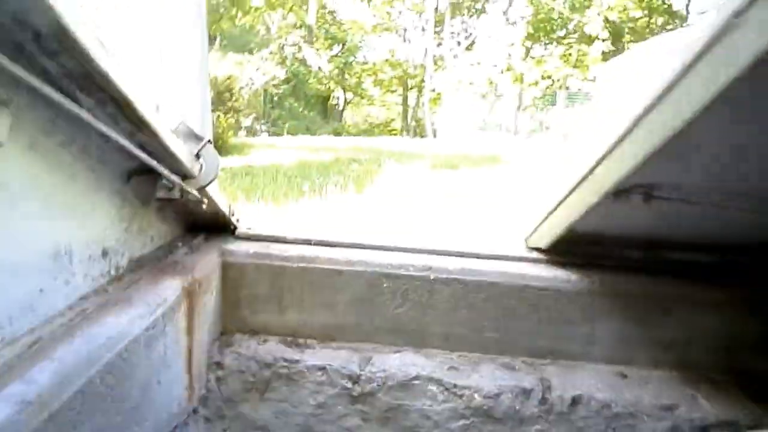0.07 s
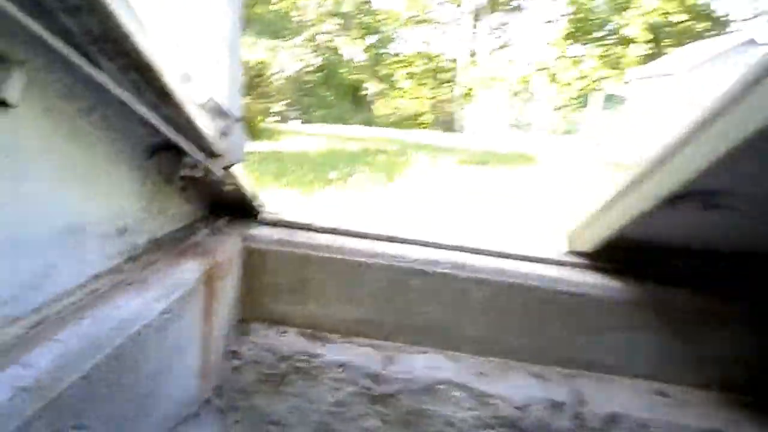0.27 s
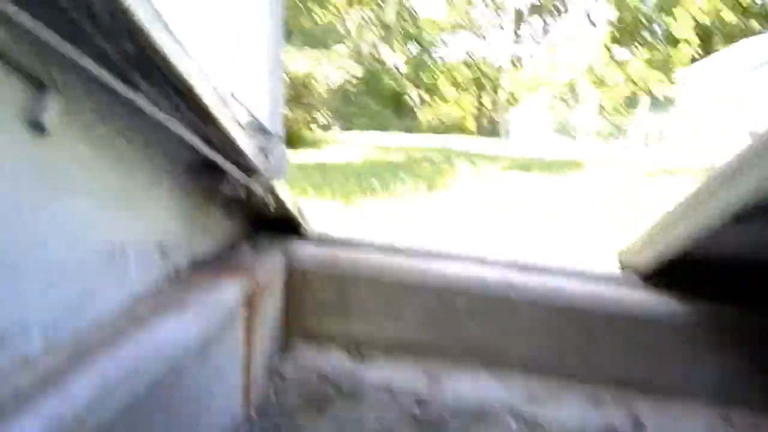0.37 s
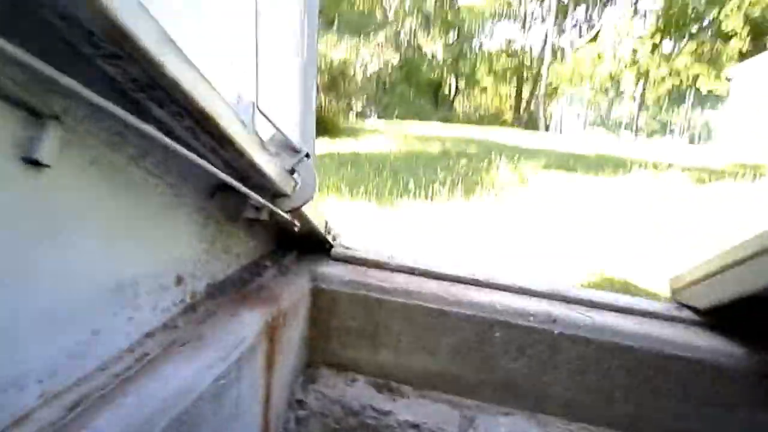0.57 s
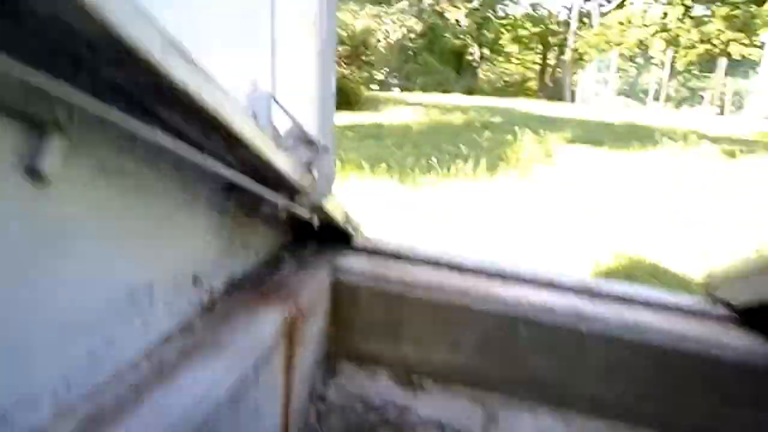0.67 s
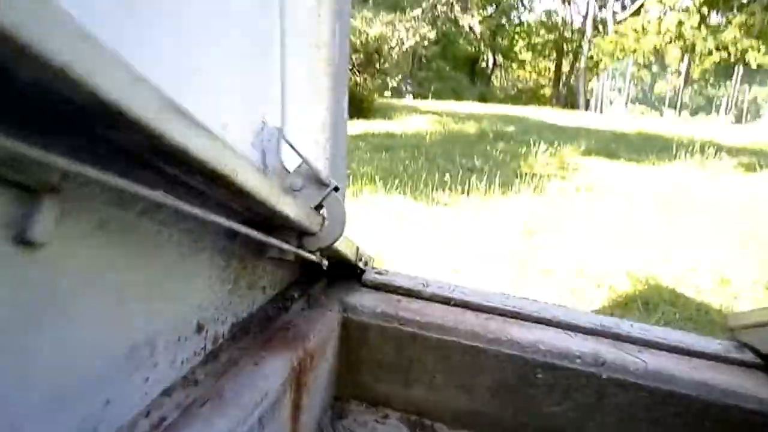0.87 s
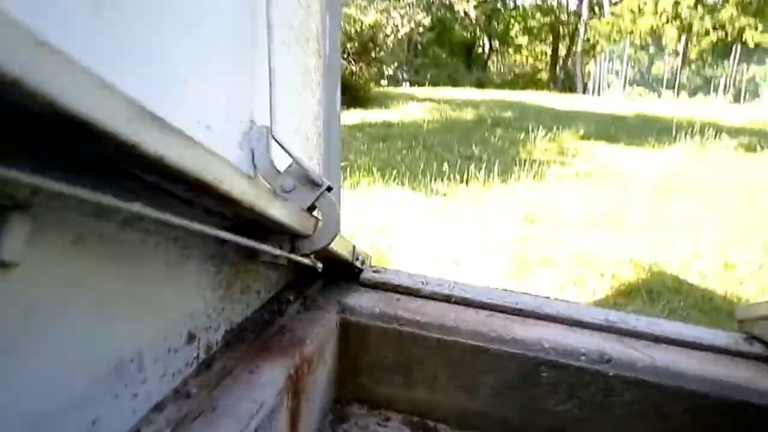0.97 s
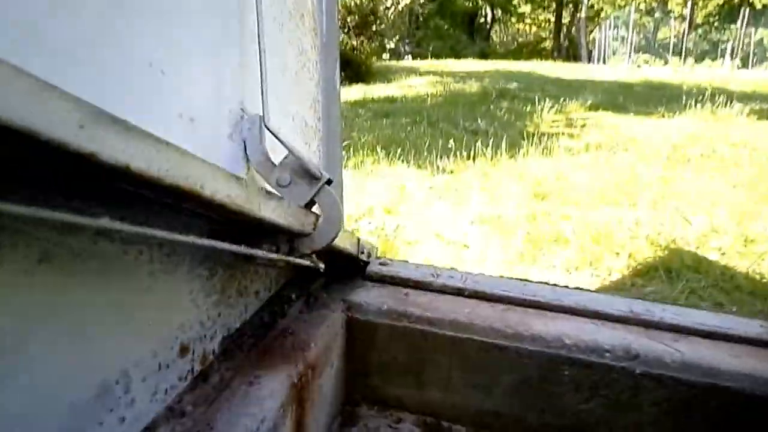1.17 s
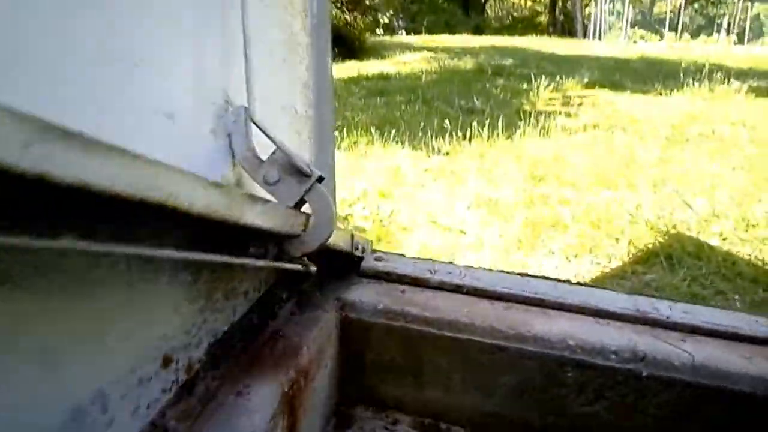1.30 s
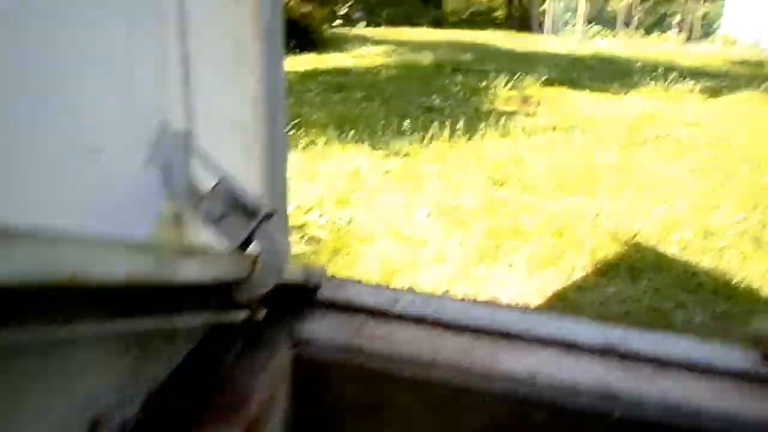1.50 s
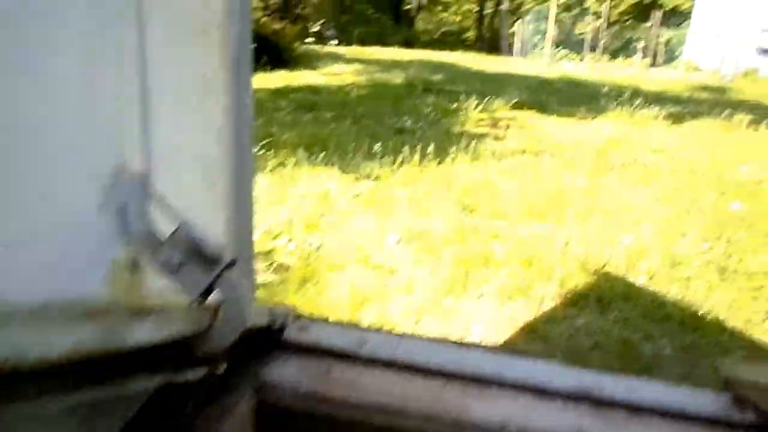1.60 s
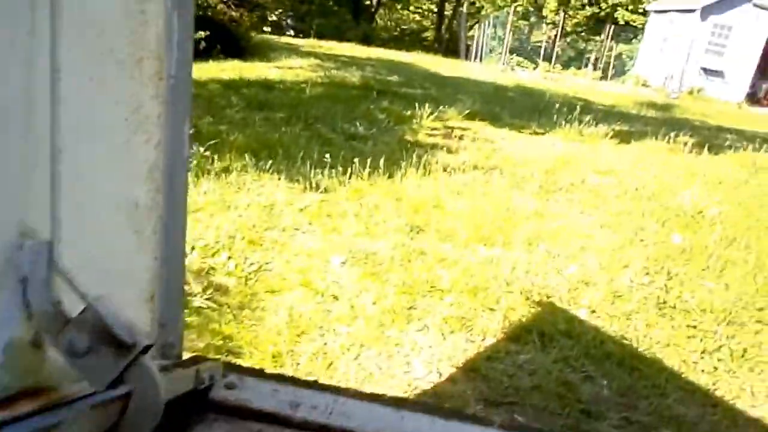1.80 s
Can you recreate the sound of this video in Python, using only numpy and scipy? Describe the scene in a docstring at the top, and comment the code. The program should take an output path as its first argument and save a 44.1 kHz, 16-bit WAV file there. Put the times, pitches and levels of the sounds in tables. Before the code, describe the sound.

A steel cellar hatch opens with a thin hinge squeal and a dull knock, then squawks at about 0.3 seconds. A whistling whine sinks into a groan near 0.8 seconds and rises again, with scraping and a short stairwell echo. At about 1.15 seconds the hatch bangs loudly, then rebounds and rattles until 1.6. A faint squeak follows near 1.8 seconds over a soft outdoor hush.

```python
"""A thin squeal comes from the dry hinges of a steel cellar hatch pushed open from below. Stick-slip
friction goes on to give a short squawk, a whistle, then a whine that sinks into a groan as the load
grows and rises as it eases. The leaf scrapes, bangs against its stop, rebounds and rattles, each
impact exciting its modes, and settles with a faint squeak. The stairwell echoes the hinges."""
import sys
import numpy as np
from scipy import signal
from scipy.fft import rfft, irfft, next_fast_len
from scipy.io import wavfile
from scipy.ndimage import uniform_filter1d, minimum_filter1d, map_coordinates

SR = 44100
rng = np.random.default_rng(int(sys.argv[2]) if len(sys.argv) > 2 else 0)


def wav_out(sig):
    """Save sig, one row per channel (or a flat mono array), as 16-bit PCM at SR to the path in sys.argv[1]."""
    wavfile.write(sys.argv[1], SR, np.round(np.clip(np.atleast_2d(sig).T, -1, 1) * 32767).astype(np.int16))


N = 81585
FLUTTER_HZ = 170  # rate of the fine pitch tremor of hinge and pin


def amp(db):
    """Amplitude ratio of a level in decibels."""
    return 10 ** (np.asarray(db) / 20)


def unit(x):
    """Normalisation to an rms of 1."""
    return x / np.sqrt(np.mean(x ** 2) + 1e-20)


def along(points, hz):
    """Interpolation of (Hz, value) points on a logarithmic frequency axis."""
    freqs, values = np.transpose(points)
    return np.interp(np.log(hz + 1), np.log(freqs + 1), values)


def curves(rows):
    """Linear interpolation in time: one value per sample for each column after the first."""
    times, *columns = np.transpose(rows)
    return [np.interp(np.arange(N) / SR, times, column) for column in columns]


def wobble(rate):
    """Smooth random modulation: a spline through `rate` random values a second."""
    return map_coordinates(rng.standard_normal(4096), [np.arange(N) * rate / SR], mode='wrap')


def filtered(x, response):
    """Linear filtering: the spectrum of x is multiplied by a frequency response."""
    size = 2 * next_fast_len(len(x))
    return irfft(rfft(x, size) * response(np.fft.rfftfreq(size, 1 / SR)), size)[:len(x)]


def coloured(x, tone):
    """Minimum-phase filtering: a causal response with the given (Hz, dB) shape."""
    def response(hz):
        cepstrum = irfft(np.log(amp(along(tone, hz))))
        cepstrum[1:len(cepstrum) // 2] *= 2
        cepstrum[len(cepstrum) // 2 + 1:] = 0
        return np.exp(rfft(cepstrum))
    return filtered(x, response)


def noise(tone):
    """Spectral shaping: Gaussian noise of rms 1 with the given (Hz, dB) shape."""
    return unit(filtered(rng.standard_normal(N), lambda hz: amp(along(tone, hz))))


def damped(x, t60):
    """Frequency-dependent damping over one second; T60 is the time taken to fall by 60 dB."""
    hz, t, spectra = signal.stft(x[:SR], SR, nperseg=256)
    decay = amp(-60 * t / along(t60, hz)[:, None])
    return signal.istft(spectra * decay, SR, nperseg=256)[1][:SR]


def ring(modes, scatter_db, detune_hz=3):
    """Free vibration: one second of damped modes, each randomly offset in level and frequency."""
    t = np.arange(SR) / SR
    return sum(amp(db + scatter_db * rng.normal() - 60 * t / t60)
               * np.sin(2 * np.pi * (hz + detune_hz * rng.normal()) * t) for hz, db, t60 in modes)


def stick_slip(phrase, tone):
    """Relaxation oscillation: one pulse per slip; roughness scatters timing and size and adds grit."""
    # Dry hiss of the slipping pin. Each row: frequency in Hz, relative level in dB.
    hiss_tone = [(500, -51), (2600, 14), (7300, 2.5), (9300, -12), (15500, -36)]
    jitter_s, size_db, waver, grit_db, hiss_db = .000037, 6, .0344, -11, -7.5  # at full roughness
    hz, db, roughness = curves(phrase)
    t = np.arange(N) / SR
    slip_rate = hz * (1 + waver * roughness * wobble(rate=259.1) + .003 * wobble(FLUTTER_HZ))
    cycles = np.cumsum(slip_rate) / SR
    slip_at = np.interp(np.arange(1, int(cycles[-1])), cycles, np.arange(N))
    timing, size = rng.standard_normal((8192, 2))[:len(slip_at)].T
    uneven = roughness[slip_at.astype(int)]
    slip_at = np.clip(slip_at + jitter_s * SR * uneven * timing, 0, N)
    # Windowed sinc pulses let a slip fall between samples.
    taps = slip_at.astype(int)[:, None] + np.arange(-7, 9)
    offset = taps - slip_at[:, None]
    pulses = np.sinc(offset) * np.cos(np.pi * offset / 16) ** 2 * amp(size_db * uneven * size)[:, None]
    slips = np.bincount(np.clip(taps, 0, N).ravel(), pulses.ravel(), N + 1)[:N]
    low_cut_hz = .75 * hz.min()
    slips = filtered(coloured(slips, tone), lambda f: f ** 8 / (f ** 8 + low_cut_hz ** 8))
    slips /= np.sqrt(np.abs(uniform_filter1d(slips ** 2, size=700)) + 1e-12)  # hold the rms at 1
    friction = amp(grit_db) * noise(tone) + amp(hiss_db) * noise(hiss_tone)
    grit = roughness * friction * (1 + np.cos(2 * np.pi * cycles))
    sounding = uniform_filter1d(1. * (t >= phrase[0][0]) * (t <= phrase[-1][0]), size=300)
    return amp(db) * sounding * (slips + grit)


def hinge_creaks():
    """Stick-slip friction in the dry hinges: the slip rate sets the pitch of each phrase."""
    # Phrases. Each row: time in seconds, slip rate in Hz, relative level in dB, roughness from 0 to 1.
    onset = [(0, 1210, -37, 0.54), (.02, 1311, -38, 0.53), (.042, 1566, -34, 0.7), (.065, 1820, -41, 0.32)]  # the hinge first gives way
    squeal = [(.036, 1680, -42, .4), (.07, 1953, -32, .15), (.098, 1960, -28.5, .12),
              (.12, 2126, -30.5, .2), (.168, 2220, -33, .42), (.19, 2400, -31.5, .2), (.21, 2485, -26, .06),
              (.228, 2470, -32, .15), (.24, 2470, -32, .6), (.255, 2400, -45, .6)]
    squawk = [(.248, 1123, -38, .6), (.26, 1000, -23.5, .7), (.272, 905, -20.5, .75),
              (.283, 792, -21.5, .35), (.295, 791, -20, .16), (.32, 790, -19.5, .11), (.339, 792, -24, .25),
              (.343, 1029, -24, .6), (.357, 1068, -28, .7), (.365, 1230, -29.5, .55), (.39, 1440, -32, .35),
              (.415, 1498, -37, .35), (.43, 1600, -50, .4)]
    whistle = [(.365, 1700, -43, .5), (.4, 1970, -36, .4), (.433, 2165, -31, .08), (.46, 2107, -32, .1),
               (.49, 2089, -33, .15), (.52, 2019, -32.5, .2), (.535, 1945, -35, .45),
               (.565, 1890, -36, .65), (.61, 1850, -46, 1)]
    whine = [(.565, 1612, -38, 1), (.582, 1548, -25, 0.5), (.606, 1520, -30, 0.5), (.622, 1656, -27.5, 0.4),
             (.655, 1430, -32, 0.4), (.688, 1260, -26, 0.35), (.725, 1150, -36, 0.6)]
    groan = [(.655, 737.5, -33, 0.53), (.675, 689.4, -25.5, 0.72), (.695, 565.8, -23.5, 0.36),
             (.715, 550.5, -24, 0.33), (.726, 387.9, -21, 0.6), (.745, 365.7, -21.5, 0.35),
             (.775, 338, -20.5, .3), (.79, 342, -21, .15), (.805, 353, -21, 0.25), (.835, 359, -20, 0.1),
             (.872, 371, -21, 0.04), (.888, 374, -23.5, 0.6), (.91, 380, -34, 0.8)]  # the load grows
    release = [(.89, 520, -32, .7), (.91, 559, -25, .35), (.93, 635, -27.5, .5), (.945, 700, -28.5, .55),
               (.96, 764, -28, .17), (.972, 769, -27.5, .1), (.99, 782, -35, .3), (1.02, 800, -50, .3)]  # the load eases
    settle = [(1.77, 1225, -66, 0.296), (1.8, 1188, -55, 0.37), (1.85, 1230, -60, 0.3)]  # the leaf comes to rest
    # Spectral envelopes of the phrases. Each row: frequency in Hz, relative level in dB.
    whine_tone = [(700, -11.5), (1400, 9.5), (3100, 2.5), (4600, -14), (6200, -3), (9000, -59)]
    squeal_tone = [(1000, -4), (2100, 0), (4200, -3), (5000, 0), (6500, 0), (7400, -10), (8400, -21),
                   (9600, -42)]
    squawk_tone = [(800, -22), (1100, -7), (1600, 2), (2000, 4), (2350, -9), (2750, 5), (3150, 2),
                   (4000, -13), (4750, -14), (5500, -4), (9500, -42)]
    groan_tone = [(200, -18), (360, -4.5), (520, -8), (720, 1), (1080, 6), (1700, 1.5), (3700, 1.5),
                  (4700, -16), (7200, -8), (9000, -56)]
    release_tone = [(300, -22), (750, 0.5), (2300, 4), (3200, 5.5), (4200, -8), (5400, -5), (6200, -25),
                    (7400, -3), (9500, -35)]
    phrases = [(onset, whine_tone), (squeal, squeal_tone), (squawk, squawk_tone), (whistle, squeal_tone),
               (whine, whine_tone), (release, release_tone), (settle, whine_tone)]
    squeaks = sum(stick_slip(phrase, tone) for phrase, tone in phrases)
    return squeaks + bracket(stick_slip(groan, groan_tone))


def through_leaf(x):
    """Dispersion: bending waves carry treble faster than bass, smearing each slip over milliseconds."""
    spread_s, reference_hz, lead_s = .006, 1000, .004

    def response(hz):
        lag_cycles = 2 * spread_s * np.sqrt(hz * reference_hz) - lead_s * hz
        return np.exp(-2j * np.pi * lag_cycles)
    return filtered(x, response)


def wandering_contact(x):
    """Spectral modulation: as the contact wanders over the rusty pin, overtones swell and fade apart."""
    swell_db, width_hz, swell_s = 2.5, 700, .02
    hz, t, spectra = signal.stft(x, SR, nperseg=512)
    grid = np.meshgrid(hz / width_hz, t / swell_s, indexing='ij')
    swells = map_coordinates(rng.standard_normal((64, 128)), grid)
    return signal.istft(spectra * amp(swell_db * (swells - .5)), SR, nperseg=512)[1][:N]


def stairwell(x):
    """Reverberation: reflections between steel and masonry merge into a short diffuse tail."""
    # Decay of the echo. Each row: frequency in Hz, T60 in seconds.
    well_t60 = [(200, 0.19), (1500, 0.2), (7000, 0.042)]
    tail = damped(rng.standard_normal(SR), well_t60)
    return signal.fftconvolve(x, tail / np.linalg.norm(tail))[:N]


def air():
    """Ambient noise: a broad outdoor hush and the hum of the stairwell's low resonance."""
    # Spectrum of the hush. Each row: frequency in Hz, relative level in dB.
    air_tone = [(25, 24.5), (50, 42), (80, 17), (350, 17.5), (1200, 31.5), (2500, -10), (15500, -3)]
    hum_hz, half_width_hz = 128, 14
    hum = filtered(rng.standard_normal(N), lambda hz: 1 / (1 + ((hz - hum_hz) / half_width_hz) ** 2))
    return amp(-54) * noise(air_tone) + amp(-56) * unit(hum)


def contact_noise(level, tone):
    """Amplitude modulation: a fast random flicker gives the noise of steel on steel its grain."""
    db, = curves(level)
    started = np.arange(N) / SR >= level[0][0]
    return amp(db + 1.7 * wobble(rate=210)) * noise(tone) * started


def scrape():
    """Sliding friction: the leaf rubs on its frame and radiates broadband noise."""
    # Course of the rubbing. Each row: time in seconds, level in dB.
    rub_level = [(0, -44), (.24, -45.5), (.5, -48), (.55, -38), (.62, -39.5), (1, -42), (1.05, -45.5),
                 (1.08, -35), (1.11, -38.5), (1.15, -41.5), (1.3, -111), (1.72, -52.5), (1.81, -54.5),
                 (1.85, -55.5)]
    # Its spectrum. Each row: frequency in Hz, relative level in dB.
    rub_tone = [(60, -9), (120, 6), (200, 3.5), (380, 2.5), (700, 2.5), (2000, 3), (4200, -4), (7300, 2.5),
                (9500, -12.5), (15500, -15.5)]
    return contact_noise(rub_level, rub_tone)


def knocks():
    """Damped transients: the leaf shifts in its hinges with dull knocks."""
    # Shifts of the leaf. Each row: start in seconds, level in dB.
    shifts = [(.133, -23), (.144, -24), (1.828, -43.5)]
    # Spectrum of a knock. Each row: frequency in Hz, relative level in dB.
    knock_tone = [(59, -60), (184, -15), (253, -0.5), (472, -12.5), (686, -1.5), (1160, -14), (2500, -60),
                  (7000, -20.5), (10000, -42)]
    # Its decay. Each row: frequency in Hz, T60 in seconds.
    knock_t60 = [(230, 0.28), (600, 0.12), (5000, 0.24)]
    out = np.zeros(N)
    for start, db in shifts:
        add(out, start, amp(db) * damped(noise(knock_tone), knock_t60))
    return out


def pin():
    """Natural vibration: during the squawk the pin sings its own tone, out of tune with the slips."""
    span_s, pin_hz = (.272, .36), 4052
    t = np.arange(N) / SR
    swell = np.sin(np.pi * np.interp(t, span_s, (0, 1)))
    return amp(-33) * swell * np.sin(2 * np.pi * pin_hz * t + wobble(FLUTTER_HZ) / np.pi)


def bracket(x):
    """Forced resonance: the hinge bracket colours the slow slips of the groan."""
    # Bracket modes. Each row: centre in Hz, bandwidth in Hz, gain in dB relative to the direct path.
    modes = [(1080, 70, -9), (1740, 130, -2), (2240, 200, -2), (3550, 250, -3)]

    def response(hz):
        return 1 + sum(amp(db) * 1j * hz * width / (centre ** 2 - hz ** 2 + 1j * hz * width)
                       for centre, width, db in modes)
    return filtered(x, response) / 2 ** .5


def bang():
    """Impact excitation: each blow cracks, rings the sheet and flexes the leaf; soft ones rise slower."""
    # Blows of the leaf. Each row: start in seconds, then clang, crack and thump levels in dB.
    blows = [(1.149, -23, -19, -20), (1.153, -28, -12, -26), (1.157, -30, -13, -30), (1.164, -35, -18, -21),
             (1.188, -36, -22, -34), (1.198, -27, -17, -36), (1.233, -34, -28, -31), (1.37, -43, -38, -58),
             (1.386, -38, -50, -35), (1.405, -38, -40, -32), (1.428, -31, -29, -28), (1.445, -37, -33, -34),
             (1.474, -42, -36, -36), (1.551, -43, -34, -68), (1.595, -52.5, -67, -37),
             (1.632, -47, -41, -42)]
    # Modes. Each row: frequency in Hz, relative level in dB, T60 in seconds.
    sheet_modes = [(240, -2, .45), (360, -6, .35), (475, -3, .25), (790, -5, .2), (1136, 0, .19),
                   (1400, 0, .2), (1583, -2, .2), (1960, 0, .2), (2126, -3, .2), (2670, -10, .25)]  # ringing of the sheet
    flex_modes = [(47, -12, .8), (88, -6, .12), (109, 0, .19), (136, -10, .25)]  # bending of the whole leaf
    # Noise spectra. Each row: frequency in Hz, relative level in dB.
    clang_tone = [(35, -20), (60, -7), (187, -4.5), (226, 5.5), (480, -1.5), (600, -6), (1960, -2.5),
                  (4120, -21), (7030, -25), (15500, -77)]  # modes too crowded to tell apart
    crack_tone = [(60, -9), (160, 0), (1900, 0), (3400, -5), (4800, -12), (7200, -11), (9000, -32),
                  (15500, -43)]
    # Decay of the crowded modes. Each row: frequency in Hz, T60 in seconds.
    clang_t60 = [(100, 0.65), (350, 0.49), (1000, 0.28), (3000, 0.36), (7000, 0.4), (12000, 0.31)]
    crack_t60_s, full_scale_rise_s = .05, .00003
    out, t = np.zeros(N), np.arange(SR) / SR
    for start, clang_db, crack_db, thump_db in blows:
        clang = damped(noise(clang_tone), clang_t60) + amp(-16) * ring(sheet_modes, scatter_db=8)
        crack = noise(crack_tone)[:SR] * amp(-60 * t / crack_t60_s)
        thump = ring(flex_modes, scatter_db=1.5)
        rise = 1 - np.exp(-t * amp(max(clang_db, crack_db)) / full_scale_rise_s)
        add(out, start, rise * (amp(clang_db) * clang + amp(crack_db) * crack - amp(thump_db) * thump))
    return out


def chatter():
    """Contact rattle: loose hardware buzzes after the blows."""
    # Course of the buzz. Each row: time in seconds, level in dB.
    chatter_level = [(1.16, -25.5), (1.2, -28.5), (1.25, -30), (1.29, -48.5), (1.38, -62), (1.44, -41),
                     (1.53, -87)]
    # Its spectrum. Each row: frequency in Hz, relative level in dB.
    chatter_tone = [(300, -15), (1000, 25), (2200, 19.5), (4500, 4.5), (7200, 13), (9500, -12.5),
                    (15500, -11)]
    return contact_noise(chatter_level, chatter_tone)


def add(out, start, x):
    """Superposition: x is mixed into out from `start` seconds on."""
    i = round(start * SR)
    out[i:i + len(x)] += x[:N - i]


def scene():
    """Superposition of the hinges, their echo, the leaf and the air in one channel."""
    hinges = amp(.99) * wandering_contact(through_leaf(hinge_creaks())) + pin()
    leaf = knocks() + scrape() + bang() + chatter()
    return (hinges + amp(-8.5) * stairwell(hinges) + leaf + air())[None]


def record(dry):
    """Peak limiting and band limiting: the gain dips at the loudest peaks and the top treble is cut."""
    ceiling_db, top_hz = -3, 15750
    allowed_gain = np.minimum(1, amp(ceiling_db) / (np.abs(dry[0]) + 1e-9))
    gain = uniform_filter1d(minimum_filter1d(allowed_gain, size=131), size=131)
    return filtered(dry[0] * gain, lambda hz: hz < top_hz)[None]


dry = scene()
out = record(dry)
wav_out(out)
```